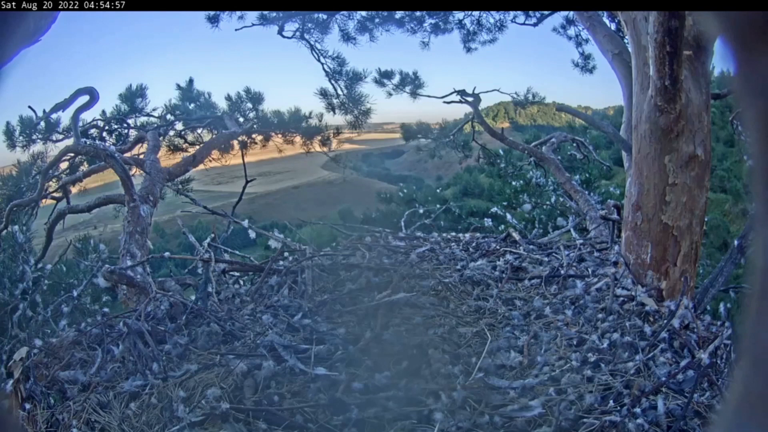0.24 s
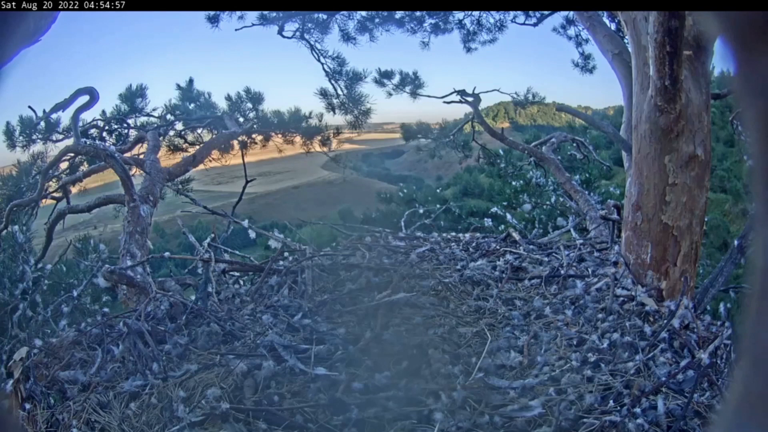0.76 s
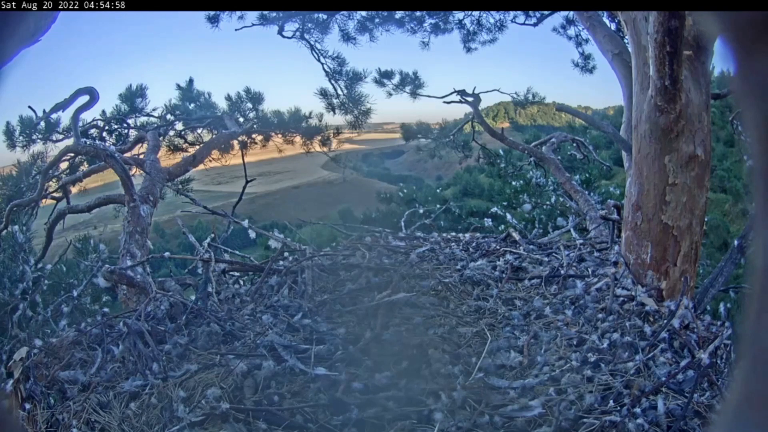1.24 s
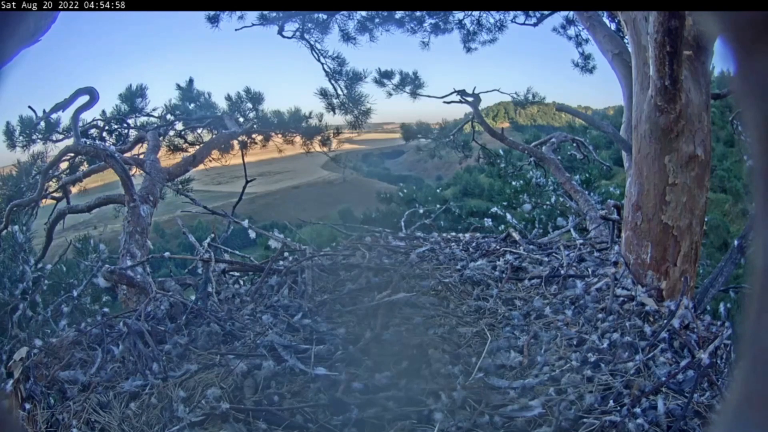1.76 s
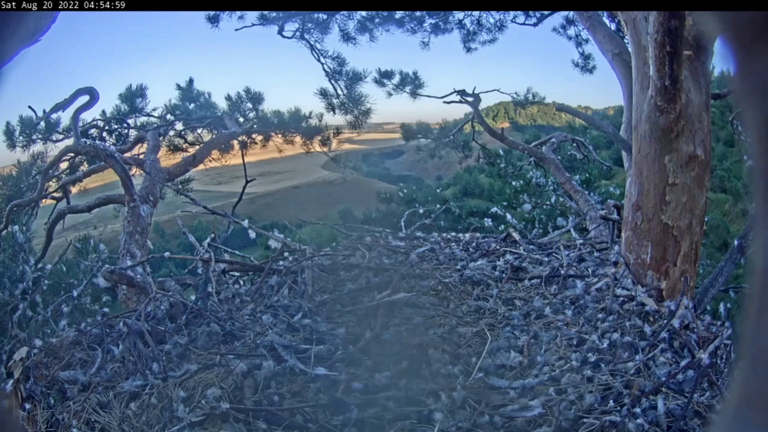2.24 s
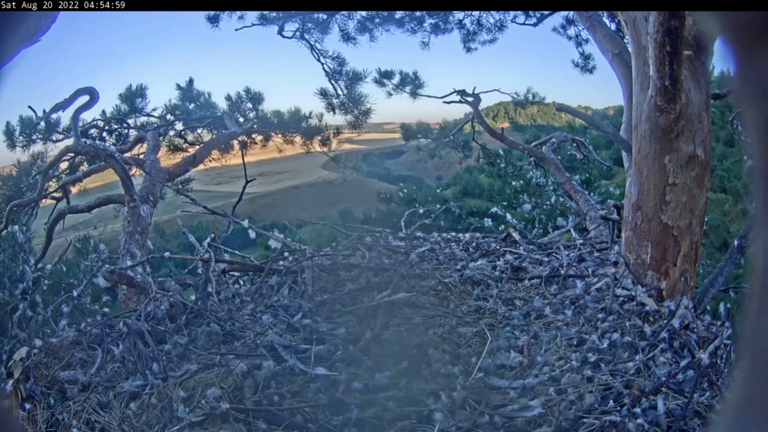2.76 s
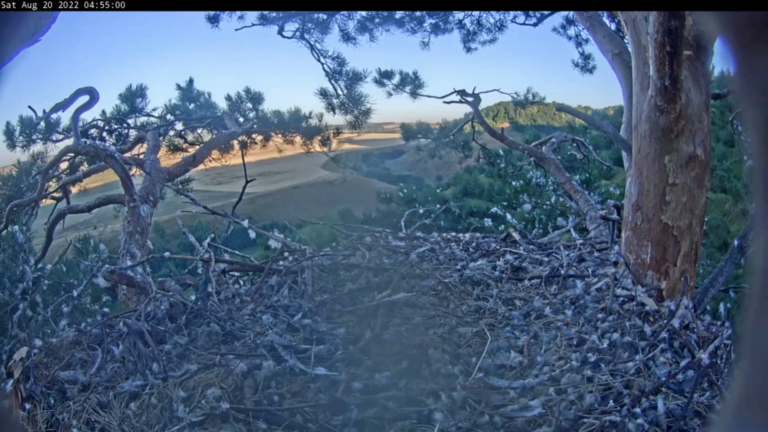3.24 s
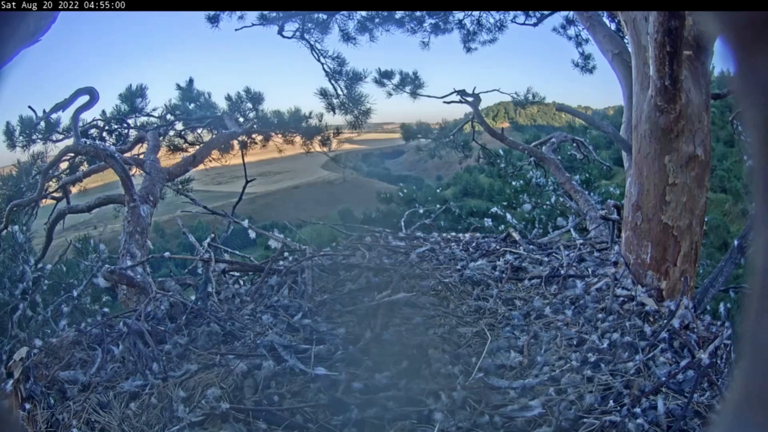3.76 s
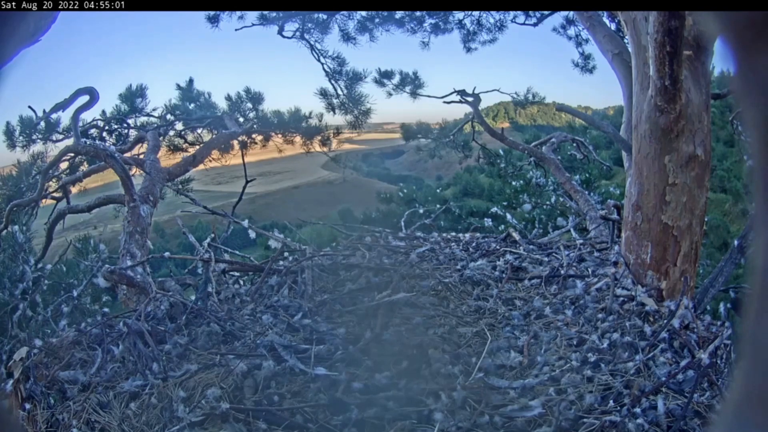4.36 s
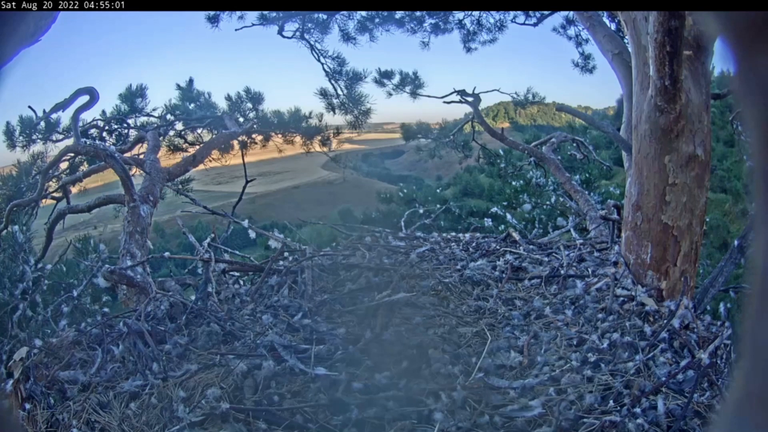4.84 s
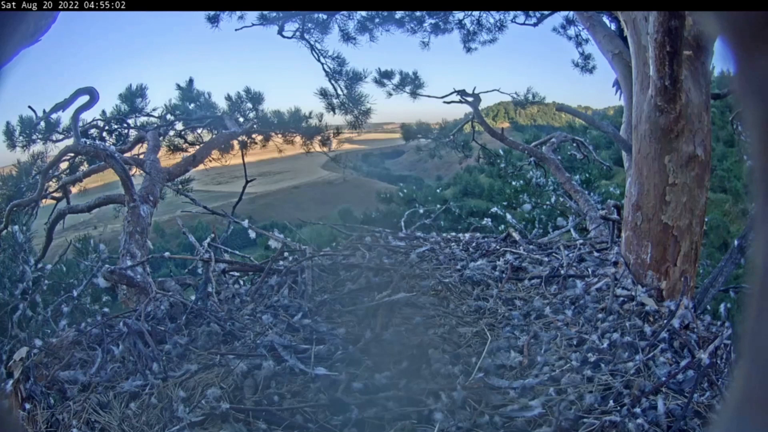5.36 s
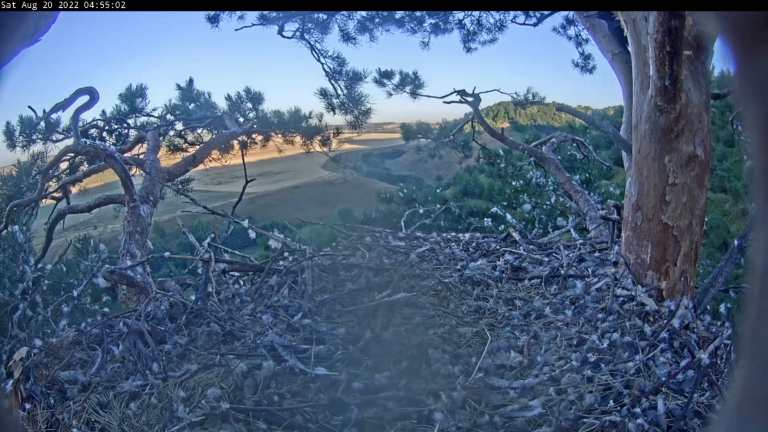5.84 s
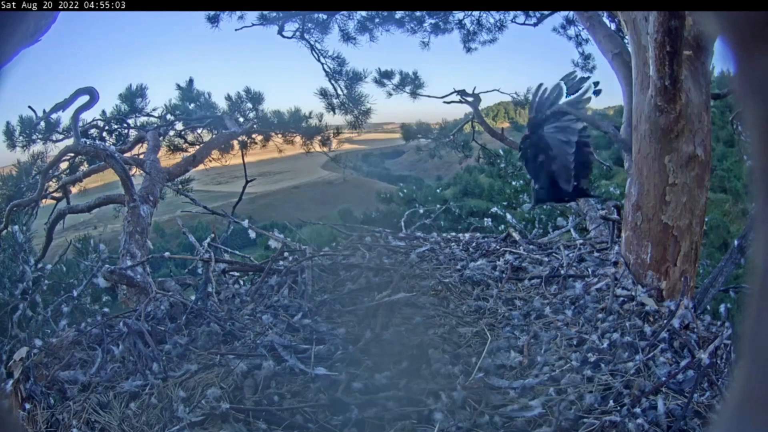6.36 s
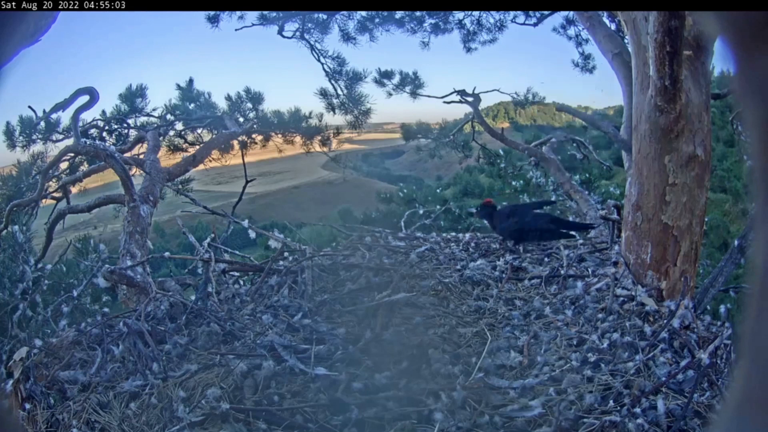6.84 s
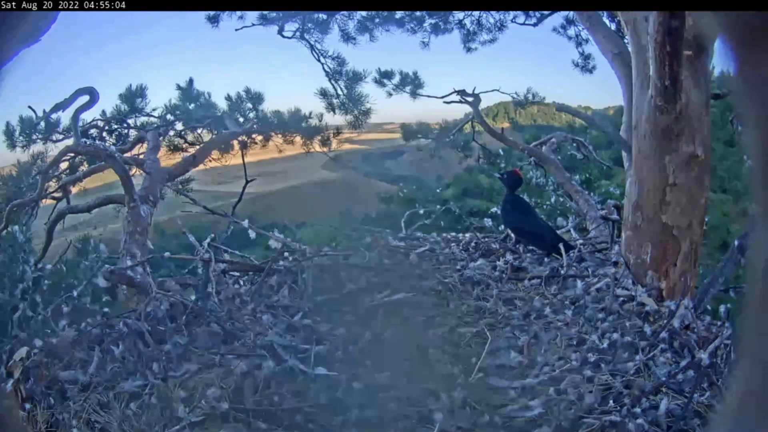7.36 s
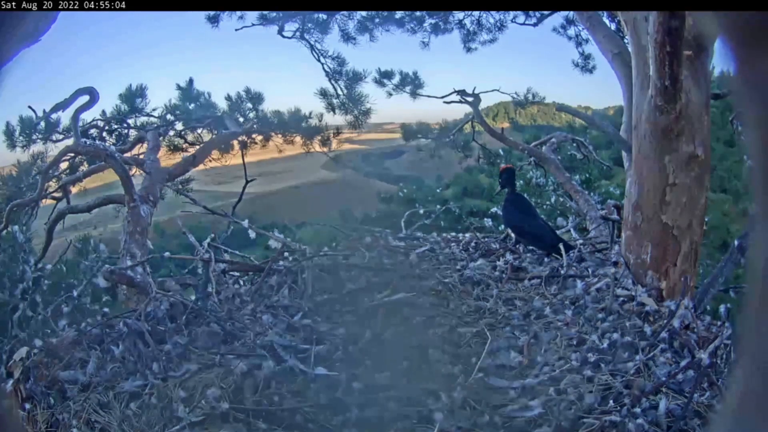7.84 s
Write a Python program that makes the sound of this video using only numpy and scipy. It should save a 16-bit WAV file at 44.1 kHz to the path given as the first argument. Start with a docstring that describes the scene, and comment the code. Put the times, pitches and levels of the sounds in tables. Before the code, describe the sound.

Over a constant humming hiss, a large black woodpecker shrieks once, flaps loudly to a stick nest, lands with a knock and falls quiet.

```python
"""A large woodpecker gives one harsh, falling shriek: a yelp, then gliding overtones that roughen and break.
Its wingbeats join a feather whirr, a puff of air and a lingering rustle; three loud ones lead to the nest.
A thud and knocks ring body and wood resonances, claws and twigs scratch and tick, and the plumage stirs.
The pine forest at dawn answers with a thin tail of filtered noise, over electrical hum and steady hiss.
A low rumble swells under the shriek and the loud wingbeats; a fast limiter holds down the peaks."""
import sys
import numpy as np
from scipy import signal
from scipy.fft import rfft, irfft, next_fast_len
from scipy.io import wavfile
from scipy.ndimage import uniform_filter1d, minimum_filter1d

SR = 44100
rng = np.random.default_rng(int(sys.argv[2]) if len(sys.argv) > 2 else 0)


def store_pcm(level_fs):
    """Save levels as 16-bit WAV."""
    pcm = np.round(np.clip(level_fs, -1, 1) * 32767).astype(np.int16)
    wavfile.write(sys.argv[1], SR, np.atleast_2d(pcm).T)


N = 356724
TIME = np.arange(N) / SR   # seconds

# Colour of the background hiss. Each row: frequency in Hz, relative density in dB per Hz.
BACKGROUND_COLOUR = [(15, -46), (25, -31), (48, -18), (242, -11), (502, -11), (567, -9), (641, -12.5),
                     (1270, -13.5), (1700, -20), (5620, -27), (6990, -32.5), (8500, -45.5), (11000, -84.5),
                     (18700, -120)]
BACKGROUND_DB = -42.5   # rms level
# Wavering electrical tone. Each row: time in seconds, frequency in Hz, rms level in dB.
HUM_TONE = [(0, 565.3, -44.5), (.7, 565.6, -43), (.95, 567.7, -40), (2.3, 567, -37.5), (3.6, 567.5, -39.5),
            (4.7, 566.7, -41), (6.0, 566.7, -44.5), (7.0, 564.4, -43.5), (8.09, 565.5, -44)]
# Mains lines. Each row: frequency in Hz, rms level in dB.
MAINS_LINES = [(50, -76), (100, -67.5)]
# Forest tail: time to decay by 60 dB, and gain.
FOREST_T60_S, FOREST_DB = 0.79, -12
# Colour of the low rumble. Each row: frequency in Hz, relative density in dB per Hz.
RUMBLE_COLOUR = [(20, 1.5), (45, -4), (90, -1), (180, -13.5), (400, -35.5)]
# Low rumble that swells under the shriek and the loud wingbeats. Each row: time in seconds, rms level in dB.
RUMBLE_LEVEL = [(4.3, -76), (4.95, -48.5), (5.17, -40), (5.26, -52), (6.2, -59), (6.45, -44), (6.9, -70)]

# Thud resonances. Each row: frequency in Hz, width in Hz, relative gain in dB.
THUD_MODES = [(191, 153, 0.5), (274, 123, 5.5)]
# Wood resonances. Each row: frequency in Hz, width in Hz, relative gain in dB.
WOOD_MODES = [(850, 270, 3.5), (1306, 230, 4.5), (2370, 490, -5.5), (3270, 120, 0)]
# Feet and body on bark and nest. Each row: start in seconds, length in seconds, thud in dB, wood in dB.
CONTACT_KNOCKS = [(4.408, 0.0065, -49, -36.5), (5.35, 0.0056, -34, -27.5), (5.615, 0.011, -32.5, -34.5),
                  (5.68, 0.0054, -29.5, -32), (5.919, 0.0042, -32, -34), (6.233, 0.0059, -38, -32.5),
                  (6.61, 0.0038, -42, -22.5), (6.617, 0.0086, -17, -24), (6.72, .024, -26.5, -29)]
# Claw scratches and twig cracks. Each row: start in seconds, length in seconds, level in dB, centre in Hz.
CLAW_SCRATCHES = [(4.87, 0.0077, -27.5, 5470), (6.727, 0.0043, -48, 3240), (6.771, 0.0078, -34, 2800),
                  (6.974, .008, -47, 5700), (7.2955, 0.0047, -30, 5900)]
SCRATCH_WOOD_DB = -4.5   # ring of the wood relative to the scratch
TICKS_PER_S, TICKS_DB = 70, -3.5   # bits of bark and twig; level relative to the stirring

# Colour of pushed air. Each row: frequency in Hz, relative density in dB per Hz.
AIR_COLOUR = [(25, -17.5), (60, -14), (130, -3), (260, 1.5), (380, 3.5), (600, -7), (1200, -37.5)]
# Colour of feather flutter. Each row: frequency in Hz, relative density in dB per Hz.
FLUTTER_COLOUR = [(300, -23.5), (560, 0.5), (750, -7.5), (950, -1.5), (1300, 1), (1700, -11.5), (3000, -22)]
# Colour of rubbing feather vanes. Each row: frequency in Hz, relative density in dB per Hz.
VANE_COLOUR = [(700, 0), (1500, -13.5), (2200, 6), (3200, 3), (4600, 5), (6200, 4), (7300, -0.5),
               (8000, -33.5), (8700, -22)]
# Stirring of the plumage between strokes. Each row: time in seconds, level in dB.
STIR_LEVEL = [(4.2, -58), (4.45, -46), (4.85, -43.5), (5.16, -31.5), (5.28, -44.5), (5.95, -44.5),
              (6.30, -43.5), (6.41, -32.5), (6.565, -39.5), (6.60, -32.5), (6.76, -39.5), (6.95, -58)]
STIR_HISS_DB = -5.5   # relative to the stirring
# Wing strokes. Each row: start in seconds, length in seconds, strength in dB, pushed air in dB.
WING_STROKES = [(4.384, 0.033, -39.5, -60), (4.625, 0.063, -39.5, -53), (4.919, .025, -36, -32),
                (5.201, 0.025, -21.5, -31), (5.462, 0.066, -33, -33.5), (5.718, 0.027, -39, -44),
                (5.809, 0.026, -28, -33), (6.017, 0.05, -26, -34.5), (6.129, 0.057, -31, -38.5),
                (6.23, .045, -36, -41.5), (6.315, 0.06, -14, -26), (6.4327, 0.044, -16, -18),
                (6.575, 0.018, -13.5, -26), (6.643, 0.04, -30.5, -32)]
FULL_STROKE_DB = -15   # strength of a full-power stroke; the next two settings hold for it
STROKE_RISE_S, STROKE_HISS_DB = 0.003, -24.5
# Weaker strokes start more softly and keep more of their hiss (dB per dB of strength).
RISE_FOLLOWS, HISS_FOLLOWS = 0.41, 0.87
HISS_GROWTH_DB, FLUTTER_SAG_DB_PER_S = 2.5, 84.5   # hiss grows over a stroke while the flutter sags

# Resonances of throat and open bill. Each row: frequency in Hz, width in Hz, relative gain in dB.
THROAT_MODES = [(1850, 400, 0), (3550, 590, -2), (4900, 300, -9.5), (5960, 600, -15.5), (7200, 890, 20)]
# Strength of an overtone by where it falls. Each row: frequency in Hz, relative level in dB.
OVERTONE_WEIGHTS = [(1000, 1), (2700, -4), (3800, -4.5), (4600, -8.5), (5800, 1), (6700, -10),
                    (7600, -11.5), (8400, -19.5)]
# Opening yelp. Each row: time in seconds, pitch in Hz, fundamental in dB, overtones in dB.
YELP_CURVE = [(4.962, 1316, -19, -34), (4.970, 1590, -12.5, -26.5), (4.974, 1610, -30, -39),
              (4.988, 1450, -23.5, -46.5)]
# The shriek sags, is pushed up again, then breaks downward twice.
# Each row: time in seconds, pitch in Hz, fundamental in dB, overtones in dB.
CRY_CURVE = [(4.992, 1921, -17, -22), (4.998, 1989, -19, -20), (5.019, 1879, -33.5, -29),
             (5.022, 1974, -24.5, -26), (5.044, 1719, -20.5, -20.5), (5.060, 1893, -13, -21.5),
             (5.085, 1853, -27, -28.5), (5.089, 2117, -11.5, -22), (5.130, 1784, -22, -33),
             (5.133, 1985, -11, -29), (5.145, 1905, -24.5, -14.5), (5.153, 1211, -14, -31),
             (5.167, 1141, -17.5, -33), (5.182, 1453, -23.5, -38), (5.188, 1916, -18, -21),
             (5.200, 1830, -17.5, -26.5), (5.209, 1000, -21.5, -32.5), (5.229, 902, -30, -33.5)]
# The other side of the syrinx croaks low in the first break.
# Each row: time in seconds, pitch in Hz, fundamental in dB, overtones in dB.
LOW_VOICE_CURVE = [(5.158, 509, -18.5, -43), (5.168, 458, -19, -34), (5.187, 482, -21.5, -33)]
# Harshness of the shriek. Each row: time in seconds, roughness from 0 to 1.
ROUGHNESS = [(4.997, 0.37), (5.015, 0.73), (5.07, .7), (5.135, .3), (5.16, 0.49), (5.22, 0.72)]
# Reflections from trunk and nest. Each row: delay in seconds, gain in dB.
NEAR_REFLECTIONS = [(.0023, -19.5), (.0061, -13.5), (0.0118, -11.5)]


def from_db(db):
    """Amplitude gain is ten to the power of a twentieth of the decibels."""
    return 10 ** (np.asarray(db) / 20)


def rms_one(x):
    """Division by the root mean square normalises the effective amplitude to 1."""
    return x / np.sqrt(np.mean(x ** 2) + 1e-20)


def in_time(rows):
    """Linear interpolation gives each column of a curve at every sample."""
    s, *columns = np.transpose(rows)
    return [np.interp(TIME, s, c) for c in columns]


def add(out, s, sound):
    """Superposition: a sound starting at s seconds adds to the mix."""
    at = round(s * SR)
    out[at:at + len(sound)] += sound[:N - at]


def noise(spectrum, size):
    """Spectral shaping: white noise weighted bin by bin takes on a colour; rms 1."""
    hz, db = np.transpose(spectrum)
    bins = np.maximum(np.arange(size // 2 + 1) * SR / size, 1)
    gain = from_db(np.interp(np.log(bins), np.log(hz), db, left=db[0] - 10, right=-100))
    return rms_one(irfft(rfft(rng.standard_normal(size)) * gain, size))


def wobble(rate_hz, size):
    """Low-pass filtering: a double pole turns white noise into smooth random motion; rms 1."""
    r = np.exp(-2 * np.pi * rate_hz / SR)
    push = rng.standard_normal(size + SR // 10)   # the extra start lets the filter settle
    return rms_one(signal.lfilter([1], [1, -2 * r, r * r], push)[-size:])


def resonate(x, modes):
    """Modal resonance: parallel two-pole filters with alternating signs ring at their own frequencies."""
    out = 0
    for k, (hz, width, db) in enumerate(modes):
        r = np.exp(-np.pi * width / SR)
        poles = [1, -2 * r * np.cos(2 * np.pi * hz / SR), r * r]
        gain = (-1) ** k * from_db(db) * (1 - r * r) / 2
        out = out + gain * signal.lfilter([1, 0, -1], poles, x)
    return out


def swell(t, length, rise, fall):
    """Envelope: a sine rise, a hold, and an exponential decay that begins one fall time before the end."""
    attack = np.sin(np.pi / 2 * np.minimum(t / rise, 1))
    return attack * np.exp(-np.maximum(t - length + fall, 0) / fall)


def background_hiss():
    """Stationary noise: a constant random signal with a fixed spectrum."""
    return from_db(BACKGROUND_DB) * noise(BACKGROUND_COLOUR, N)


def hum(waver=0.0017):
    """Frequency modulation: one electrical tone wavers slightly over faint, steady mains lines."""
    hz, db = in_time(HUM_TONE)
    phase = 2 * np.pi * np.cumsum(hz * (1 + waver * wobble(9.7, N))) / SR
    mains = sum(from_db(level) * np.sin(2 * np.pi * f * TIME) for f, level in MAINS_LINES)
    return np.sqrt(2) * (from_db(db) * np.sin(phase) + mains)


def forest(x, first_echo_s=0.008, lowest_hz=1900, highest_hz=7500):
    """Scattering: trunks and crowns return the higher tones as a thin tail of decaying random echoes."""
    t = TIME[:int(1.5 * SR)]
    decay = from_db(-60 * t / FOREST_T60_S)
    echoes = rng.standard_normal(len(t)) * decay * (1 - np.exp(-t / first_echo_s))
    echoes = echoes / np.sqrt(np.sum(echoes ** 2))
    band = signal.butter(2, [lowest_hz, highest_hz], "band", fs=SR, output="sos")
    return signal.fftconvolve(x, signal.sosfilt(band, echoes))[:N]


def low_rumble():
    """Shaped noise: a low rumble follows a level curve."""
    return from_db(in_time(RUMBLE_LEVEL)[0]) * noise(RUMBLE_COLOUR, next_fast_len(N))[:N]


def twigs(spread_db=5):
    """Impulse excitation: random ticks of uneven size ring the resonances of bark and twig; rms 1."""
    sizes = from_db(spread_db * np.minimum(rng.exponential(1, N), 2)) * rng.choice([-1, 1], N)
    clicks = sizes * (rng.random(N) < TICKS_PER_S / SR) + 1e-18
    return rms_one(resonate(clicks, WOOD_MODES) + resonate(clicks, THUD_MODES))


def slips(length, clicks_per_s=5000):
    """Stick-slip friction: a brief crowd of tiny impulses, then silence to ring into."""
    size = int(length * SR)
    clicks = rng.standard_normal(size) * (rng.random(size) < clicks_per_s / SR)
    return np.pad(clicks, (0, SR // 20))


def at_level(ring, length, db):
    """Energy equivalence: a ring carries the energy of a steady sound of this level and length."""
    return from_db(db) * rms_one(ring) * np.sqrt(length * SR / len(ring))


def contacts(scratch_width_hz=2600, scratch_top_hz=7200):
    """Forced resonance: knocks shake nest and wood; scratches rasp in their own band and ring the wood."""
    out = np.zeros(N)
    for s, length, thud_db, wood_db in CONTACT_KNOCKS:
        push = slips(length)
        add(out, s, at_level(resonate(push, THUD_MODES), length, thud_db))
        add(out, s, at_level(resonate(push, WOOD_MODES), length, wood_db))
    top = signal.butter(6, scratch_top_hz, fs=SR, output="sos")
    for s, length, db, hz in CLAW_SCRATCHES:
        push, claw = slips(length), [(hz, scratch_width_hz, 0)]
        rasp = signal.sosfilt(top, resonate(resonate(push, claw), claw))
        add(out, s, at_level(rasp, length, db))
        add(out, s, at_level(resonate(push, WOOD_MODES), length, db + SCRATCH_WOOD_DB))
    return out


def crackle(size, per_s):
    """Impulse noise: barbs snap past each other in random, uneven, band-limited clicks; rms 1."""
    clicks = rng.standard_normal(size) * (rng.random(size) < per_s / SR)
    band = signal.butter(2, [1500, 6500], "band", fs=SR, output="sos")
    return rms_one(signal.sosfilt(band, clicks))


def rustle(size, grain_db=-0.5, crackle_db=-4, snaps_per_s=600):
    """Friction noise: feather vanes rub as an uneven hiss and slip in small jerks."""
    rub = rms_one(noise(VANE_COLOUR, size) * from_db(grain_db * wobble(300, size)))
    return rub + from_db(crackle_db) * crackle(size, snaps_per_s)


def flutter(size, flutter_hz=950, flutter_jitter=0.2, whirr_share=0.36, uneven_db=2.0):
    """Aeroelastic flutter: flight feathers whirr as an unsteady tone mixed with noise; rms 1."""
    hz = flutter_hz * (1 + flutter_jitter * wobble(243, size))
    whirr = np.sqrt(2) * np.sin(2 * np.pi * np.cumsum(hz) / SR)
    # the share divides power between tone and noise
    mix = np.sqrt(whirr_share) * whirr + np.sqrt(1 - whirr_share) * noise(FLUTTER_COLOUR, size)
    return rms_one(mix * from_db(uneven_db * wobble(120, size)))


def plumage(flutter_db=-2, air_db=-4):
    """Amplitude modulation: the bird's stirring sets the level of feather noise and shifting twigs."""
    size = next_fast_len(N)
    feathers = from_db(flutter_db) * flutter(size) + from_db(STIR_HISS_DB) * rustle(size)
    feathers = feathers + from_db(air_db) * noise(AIR_COLOUR, size)
    return from_db(in_time(STIR_LEVEL)[0]) * (feathers[:N] + from_db(TICKS_DB) * twigs())


def wings(air_rise_share=.4):
    """Unsteady flow: each stroke starts with flutter, builds up a puff and ends in a lingering rustle."""
    out = np.zeros(N)
    for s, length, db, air_db in WING_STROKES:
        size = next_fast_len(int((length + .1) * SR))
        t = np.arange(size) / SR
        progress, force_db = np.minimum(t / length, 1), db - FULL_STROKE_DB
        rise = STROKE_RISE_S * from_db(-RISE_FOLLOWS * force_db)
        whirr = from_db(db - FLUTTER_SAG_DB_PER_S * t) * flutter(size) * swell(t, length, rise, fall=0.0039)
        puff = from_db(air_db) * noise(AIR_COLOUR, size)
        puff = puff * swell(t, length, air_rise_share * length, fall=0.0064)
        hiss_db = STROKE_HISS_DB + HISS_FOLLOWS * force_db + HISS_GROWTH_DB * (progress - 1)
        hiss = from_db(hiss_db) * rustle(size) * swell(t, length + 0.006, rise, fall=0.01)
        add(out, s, whirr + puff + hiss)
    return out


def voice(hz, first_db, overtones_db, rough, jitter=.022, shimmer=0.73, rasp_db=-7,
          rattle_hz=135, rattle_depth=0.56, warble_hz=330, warble_radians=0.56):
    """Self-oscillation: the syrinx gives six harmonics; roughness adds jitter, warble, rattle and rasp."""
    size = len(hz)
    t = np.arange(size) / SR
    phase = 2 * np.pi * np.cumsum(hz * (1 + jitter * rough * wobble(330, size))) / SR
    # a fast, unsteady warble splits the overtones into side tones
    phase = phase + warble_radians * rough * np.sin(2 * np.pi * warble_hz * t + wobble(60, size))
    tone = 0
    for k in range(1, 7):
        db = first_db
        if k > 1:
            db = overtones_db + np.interp(k * hz, *np.transpose(OVERTONE_WEIGHTS))
        unsteady = 1 + shimmer * rough * wobble(160, size)
        tone = tone + np.sqrt(2) * from_db(db) * np.sin(k * phase) * unsteady
    # breath noise pulses in step with each cycle
    breath = rng.standard_normal(size) * (1 + np.sin(phase))
    rasp = from_db(overtones_db + rasp_db) * rough * rms_one(resonate(breath, THROAT_MODES))
    # the membranes catch and slacken in quick turns
    rattle = 1 + rattle_depth * rough * np.sin(2 * np.pi * rattle_hz * t)
    fade = np.minimum(np.minimum(t, t[-1] - t) / .0015, 1)
    return (tone + rasp) * rattle * fade


def shriek():
    """Two-voice phonation: a yelp, then a cry joined by a low voice as it breaks; nearby wood reflects it."""
    direct, rough = np.zeros(N), in_time(ROUGHNESS)
    for curve in YELP_CURVE, CRY_CURVE, LOW_VOICE_CURVE:
        sounding = (TIME >= curve[0][0]) & (TIME < curve[-1][0])
        direct[sounding] += voice(*[control[sounding] for control in in_time(curve) + rough])
    out = direct.copy()
    for delay, db in NEAR_REFLECTIONS:
        add(out, delay, from_db(db) * direct)
    return out


def scene(wing_echo_db=-9):
    """Superposition: the bird close by, the forest behind it, hum and hiss throughout."""
    cry = shriek()
    movement = wings() + plumage() + low_rumble() + contacts()
    tail = from_db(FOREST_DB) * forest(cry + from_db(wing_echo_db) * movement)
    return (cry + movement + tail + hum() + background_hiss())[None]


def record(dry, ceiling_db=-11.4, release_db_per_s=1500, cutoff_hz=9450):
    """Dynamic range limiting: a fast gain reduction holds the peaks down, then a low-pass cuts the top."""
    over = np.maximum(20 * np.log10(np.abs(dry[0]) + 1e-9) - ceiling_db, 0)
    # the reduction jumps up with a peak and falls back at the release rate
    held = np.maximum.accumulate(over + release_db_per_s * TIME) - release_db_per_s * TIME
    gain = uniform_filter1d(minimum_filter1d(from_db(-held), size=21), size=21)
    top = signal.cheby2(14, 70, cutoff_hz, fs=SR, output="sos")
    return signal.sosfilt(top, dry * gain)


dry = scene()
out = record(dry)
store_pcm(out)
```